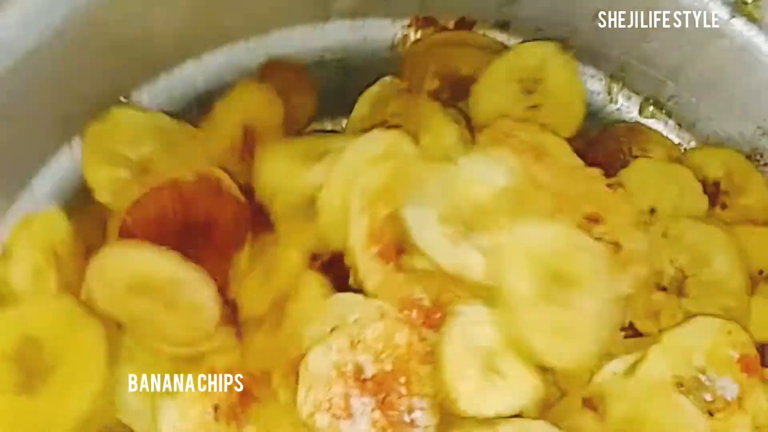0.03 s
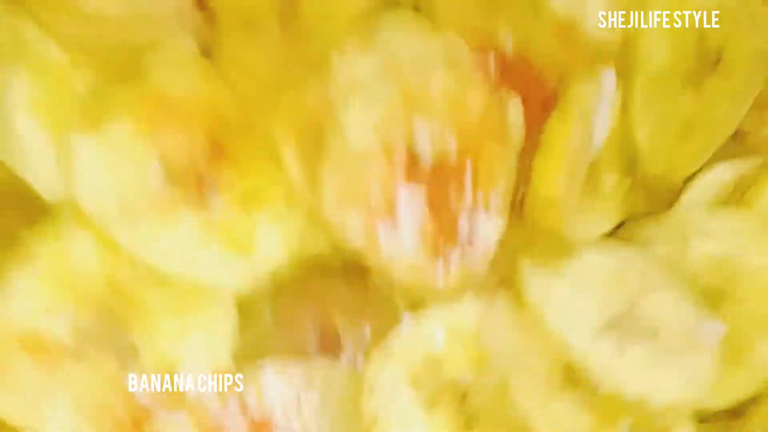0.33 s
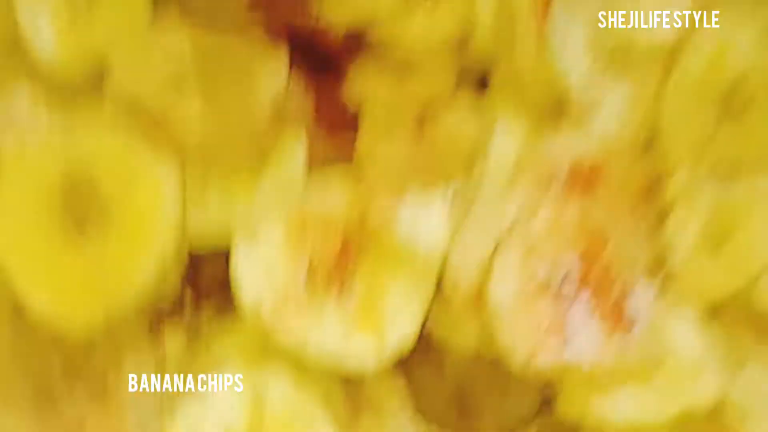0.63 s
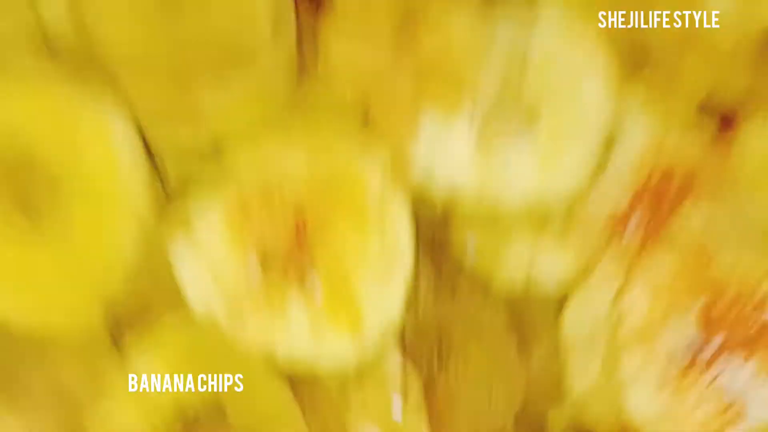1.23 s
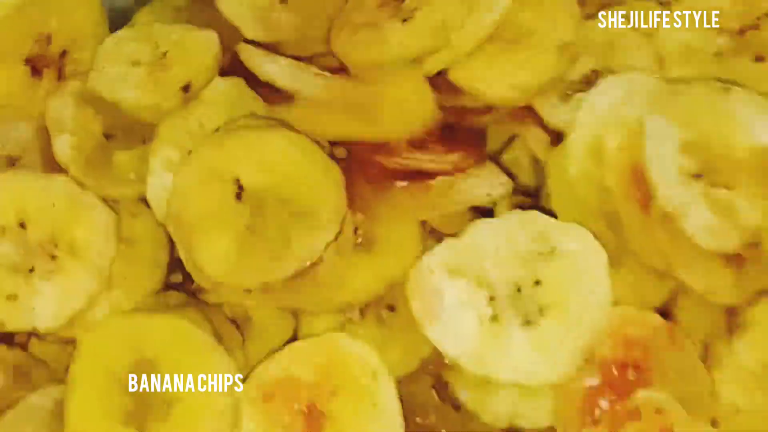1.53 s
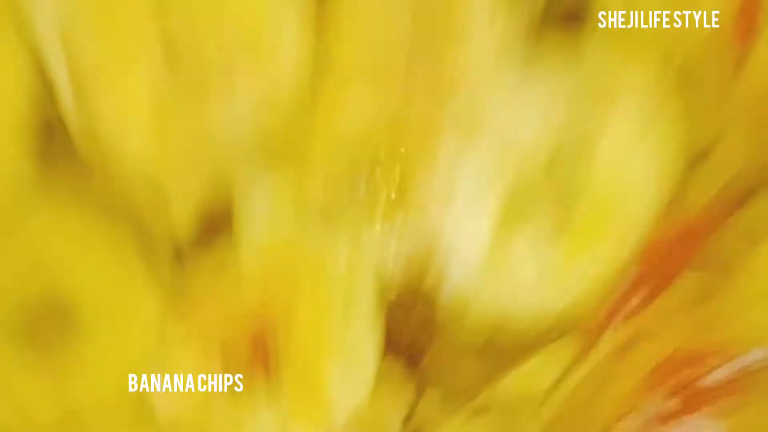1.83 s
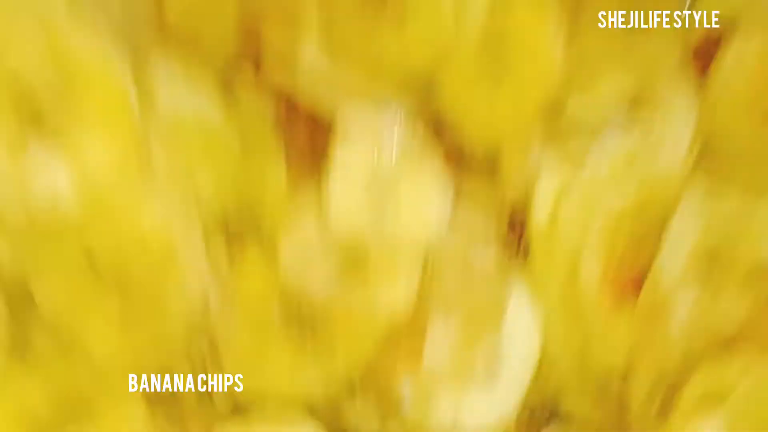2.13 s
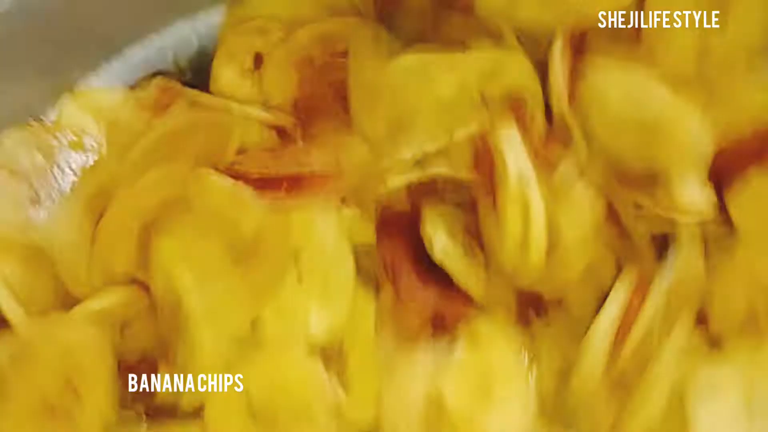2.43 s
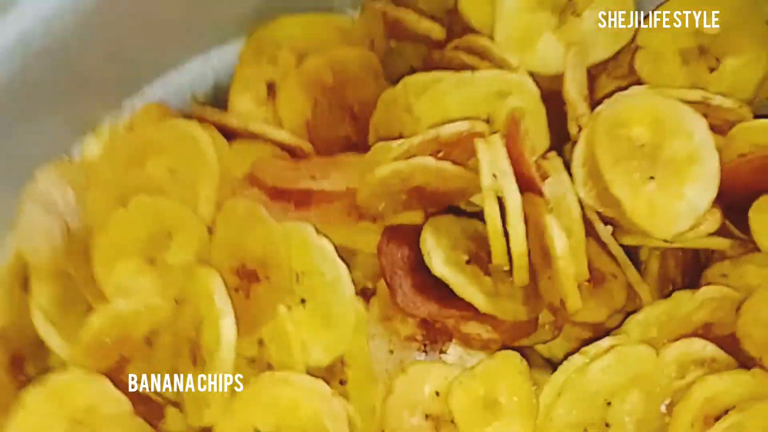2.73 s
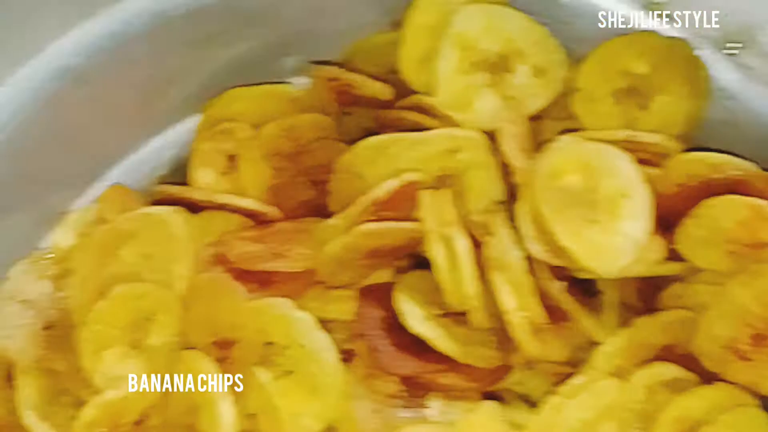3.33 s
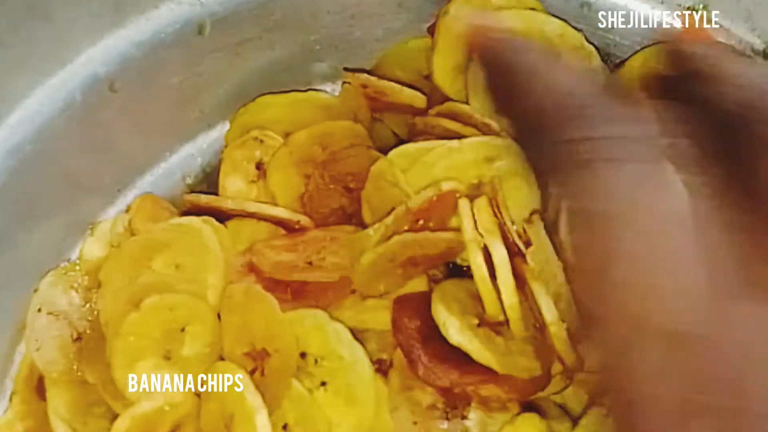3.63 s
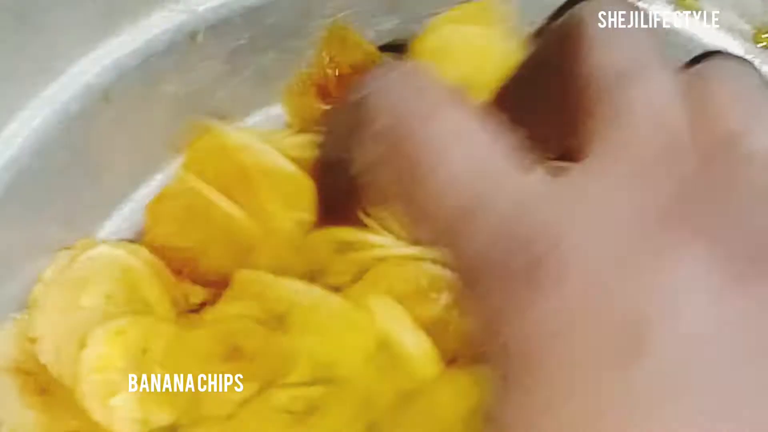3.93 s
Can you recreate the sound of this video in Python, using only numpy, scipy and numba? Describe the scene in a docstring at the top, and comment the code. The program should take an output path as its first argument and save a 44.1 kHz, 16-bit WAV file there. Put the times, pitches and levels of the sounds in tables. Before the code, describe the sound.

Crisp chips tossed repeatedly in a metal bowl, which is then set down with a knock.

```python
"""Crisp fried banana chips crash into a metal bowl, tossed six times, close by, over a low drone.
Each landing is a shower of tiny clicks that rings the bowl; a few chips drop and slide afterwards.
Between tosses the bowl scrapes faintly and the shifting heap sizzles. The bowl is set down with a
knock and a softer thud, then a hand rakes through the chips. A small kitchen adds its tail."""
import sys
import numpy as np
from scipy import signal
from scipy.fft import rfft, irfft
from scipy.io import wavfile
from numba import njit

SR = 44100
rng = np.random.default_rng(int(sys.argv[2]) if len(sys.argv) > 2 else 0)


def master(y):
    """Save y as 16-bit WAV."""
    cut = np.clip(np.atleast_2d(y).T, -1, 1)
    pcm = np.round(cut * 32767)  # scale
    wavfile.write(sys.argv[1], SR, pcm.astype(np.int16))


N = 176400
T = np.arange(N) / SR
RING_T = T[:8192]
TOP_HZ = 15900


def undb(db):
    """Decibels to gain."""
    return np.exp(np.maximum(db, -300) * (np.log(10) / 20))


def unit(response):
    """Scale to unit energy."""
    return response / np.sqrt(np.sum(response ** 2))


def through(x, response):
    """Convolve and trim to the scene length."""
    return signal.fftconvolve(x, response)[:N]


def fade(t60_s):
    """Exponential decay, 60 dB in t60_s."""
    return np.exp(-np.log(1000) * T / max(t60_s, 1e-3))


def on_log(hz, points):
    """Interpolate a table on a log-frequency axis."""
    point_hz, values = np.array(points).T
    return np.interp(np.log(np.maximum(hz, 1)), np.log(point_hz), values)


def colour(points, size=4096):
    """Minimum-phase, unit-energy response with the given spectral shape."""
    gain = undb(on_log(np.fft.rfftfreq(size, 1 / SR), points))
    cepstrum = irfft(np.log(gain))
    cepstrum[1:size // 2] *= 2
    cepstrum[size // 2 + 1:] = 0
    return unit(irfft(np.exp(rfft(cepstrum))))


def blows(times_s, levels_db):
    """One impulse per contact."""
    return np.bincount((np.asarray(times_s) * SR).astype(int), undb(levels_db), N)[:N]


def swell(peak_s, db, rise_s, hold_s, fall_db_per_s):
    """Power of a burst that climbs 30 dB in rise_s, holds and falls."""
    climb_db = 30 * np.maximum((peak_s - T) / rise_s, 0) ** 1.5
    fall_db = fall_db_per_s * np.maximum(T - peak_s - hold_s, 0)
    return undb(db - climb_db - fall_db) ** 2


def hump(middle_s, length_s, db):
    """Gaussian gain envelope, length_s spanning two standard deviations."""
    return undb(db) * np.exp(-(2 * (T - middle_s) / length_s) ** 2 / 2)


def thin_metal(x, cut_hz=630):
    """Thin metal radiates little bass."""
    return signal.sosfilt(signal.butter(2, cut_hz, "high", fs=SR, output="sos"), x)


def clicks(power, full_per_s=9000, full_db=-19.5, thinning=.3, spread_db=3):
    """Random collisions of uneven size, sparser when the chips move less."""
    draw, scatter, sign = rng.random(N), rng.standard_normal(N), rng.choice([-1, 1], N)
    motion = np.sqrt(power) / undb(full_db)
    chance = np.clip(full_per_s / SR * motion ** thinning, 1e-3, 1)
    size = undb(spread_db * np.minimum(scatter, 2))
    return (draw < chance) * sign * size * np.sqrt(power / chance / np.mean(size ** 2))


@njit
def ring_grains(start, hz, size, decay_s):
    """Each grain is a small chip ringing briefly at its own pitch."""
    out = np.zeros(N)
    for k in range(len(start)):
        phasor = size[k] + 0j
        pole = np.exp((2j * np.pi * hz[k] - 1 / decay_s) / SR)
        for i in range(start[k], min(start[k] + int(4 * decay_s * SR), N)):
            phasor *= pole
            out[i] += phasor.imag
    return out


def crunch(power, grains_per_s=8000, decay_s=.0035, spread_db=4.6, click_db=-5):
    """Ringing chips of all pitches mixed with dry clicks."""
    when, pitch, strength = rng.random((int(grains_per_s * N / SR), 3)).T
    size = undb(-spread_db * np.log(np.maximum(strength, .02)))
    grains = ring_grains((when * N).astype(np.int64), pitch * TOP_HZ, size, decay_s)
    click_gain = undb(click_db)
    return np.sqrt(power * (1 - click_gain ** 2)) * grains / np.std(grains) + click_gain * clicks(power)


# Modes of the held bowl. Each row: frequency in Hz, bandwidth in Hz, relative peak in dB.
HELD_MODES = [(741.4, 35, -6), (1270, 31, -11), (1700, 22, 10.5), (2380, 30, -26), (2520, 25, -13),
              (2794, 26, -4), (3713, 30, -14), (3677, 20, -11.5), (3648, 50, -15.5), (4970, 120, -14.5),
              (5330, 70, -11), (6270, 270, -18), (7020, 110, -17.5), (7740, 180, -19)]


def held_bowl(contacts):
    """Contacts on the metal ring the modes of the held bowl."""
    ring = sum(undb(db) * width_hz * np.exp(-np.pi * width_hz * RING_T) * np.sin(2 * np.pi * hz * RING_T)
               for hz, width_hz, db in HELD_MODES)
    return through(contacts, thin_metal(unit(ring)))


# Tosses. Each row: landing in seconds, level in dB, rise in seconds, hold in seconds,
# fall in dB per second, crackle offset in dB, bowl ring offset in dB.
TOSSES = [(0.047, -20.5, 0.072, 0.019, 166, 0, -2.5), (0.543, -21, 0.051, 0.04, 204, 1, 1),
          (1.06, -24, 0.059, 0.034, 252, 3.5, 3), (1.546, -20.5, 0.057, 0.019, 251, 2, 0.5),
          (2.035, -19.5, 0.059, 0.027, 248, -1, 1), (2.47, -16, 0.023, .037, 211.5, -3, -1)]
# Single chips hitting the bowl. Each row: time in seconds, level in dB.
DROPS = [(0.0224, -1), (0.0622, 4), (0.105, -5), (0.1406, -1), (0.285, -21.5), (0.5073, -8.5),
         (0.5441, -7.5), (0.629, -13), (.718, -16), (0.8014, -15.5), (1.023, -34), (1.0908, 2.5),
         (1.1942, -11.5), (1.227, -15.5), (1.499, -26), (1.5206, -8), (1.986, -14.5), (2.007, -0.5),
         (2.0463, 5.5), (2.086, -4), (2.2172, -12.5), (2.4478, -16), (2.4705, 4.5), (2.6137, -7.5),
         (2.972, -11)]
# Chips sliding over one another. Each row: peak time in seconds, hold in seconds, level in dB,
# crackle offset in dB.
SLIDES = [(0.194, 0.015, -40.5, -27), (0.673, 0.14, -45.5, 2.5), (0.95, 0.045, -52.5, -6),
          (1.174, 0.064, -39.5, -2), (1.67, 0.043, -58.5, -3), (2.18, 0.053, -36, -11.5),
          (2.3, .08, -55.5, -1.5), (3.005, 0.034, -33.5, 0), (3.12, 0.082, -44, -13)]
# Spectra of chip on chip and of the landing heap. Each row: frequency in Hz, relative density in dB.
CRACKLE_SPECTRUM = [(150, -23.5), (400, -25.5), (1200, -1.5), (2600, 6.5), (3200, -5), (3800, 8),
                    (4400, -0.5), (5200, 0.5), (6600, -6), (8500, -2.5), (9600, -11.5), (12500, -17.5),
                    (16000, -21)]
CLATTER_SPECTRUM = [(30, -29), (150, -27.5), (320, -16), (450, -26), (650, -10.5), (900, -12), (1350, 1),
                    (1850, -2.5), (2200, -10.5), (3200, -14.5), (5000, -26), (16000, -51.5)]
CRACKLE_DB, CLATTER_DB, BOWL_DB = -11.5, -8, -5
CRACKLE_LEAD_S, BOWL_FALL_DB_PER_S, HEAP_BOWL_DB = 0.0081, 381.5, -12.5
DROP_DB, DROP_CRACKLE_DB, DROP_BOWL_DB = -1, -2, 1.5
SLIDE_RISE_S, SLIDE_FALL_DB_PER_S = 0.048, 255.5


def chips():
    """Chips crackle together first, then the heap clatters onto the metal, rings it and damps it."""
    bursts = [row[:-1] for row in TOSSES]
    bursts += [(s, db, SLIDE_RISE_S, hold, SLIDE_FALL_DB_PER_S, crackle_db)
               for s, hold, db, crackle_db in SLIDES]
    crackle_power = sum(swell(s - CRACKLE_LEAD_S, db + crackle_db, rise, hold, fall)
                        for s, db, rise, hold, fall, crackle_db in bursts)
    heap_power = sum(swell(*row[:-1]) for row in bursts)
    landing_power = sum(swell(s, db + ring_db, rise, hold, BOWL_FALL_DB_PER_S)
                        for s, db, rise, hold, _, _, ring_db in TOSSES)
    drops = undb(DROP_DB) * blows(*np.array(DROPS).T)
    on_metal = clicks(landing_power + undb(HEAP_BOWL_DB) ** 2 * heap_power) + undb(DROP_BOWL_DB) * drops
    crackle = through(crunch(crackle_power) + undb(DROP_CRACKLE_DB) * drops, colour(CRACKLE_SPECTRUM))
    clatter = through(crunch(heap_power) + drops, colour(CLATTER_SPECTRUM))
    return undb(CRACKLE_DB) * crackle + undb(CLATTER_DB) * clatter + undb(BOWL_DB) * held_bowl(on_metal)


# Drone envelope. Each row: time in seconds, level in dB.
DRONE_LEVEL = [(0, -53), (.4, -62.5), (.65, -57), (.92, -52), (1.15, -54.5), (1.85, -58.5), (2.15, -56),
               (2.36, -46), (2.6, -54), (2.85, -55.5), (3.45, -49), (3.7, -52.5), (4, -52.5)]
# Drone spectrum. Each row: frequency in Hz, relative density in dB.
DRONE_SPECTRUM = [(25, -12.5), (70, -11.5), (110, -17.5), (170, -25.5), (220, -5.5), (290, 4.5), (360, 0),
                  (450, 5.5), (530, -3.5), (680, -28), (1000, -26.5), (1700, -32.5), (2500, -34.5),
                  (6000, -49), (16000, -58)]


def drone(waver_db=1.8, wavers_per_s=18):
    """A low background rush, like a fan or burner, that swells and wavers."""
    waver = signal.resample(rng.standard_normal(int(wavers_per_s * N / SR)), N)
    level_db = np.interp(T, *np.array(DRONE_LEVEL).T) + waver_db * waver
    return through(rng.standard_normal(N), colour(DRONE_SPECTRUM)) * undb(level_db)


# Bowl scrapes. Each row: middle in seconds, length in seconds, pitch in Hz, level in dB.
SCRAPES = [(0.358, 0.1, 2520, -78), (0.366, .15, 3010, -77), (1.012, 0.054, 2740, -47.5),
           (1.014, 0.097, 1743, -49), (1.46, 0.07, 2550, -63), (3.246, 0.057, 870, -45),
           (3.288, 0.17, 2945, -69), (3.342, .06, 1354, -52)]


def bowl_scrapes(width_hz=170):
    """The bowl rubs and sings briefly as it is moved: noise drives one resonance per scrape."""
    decay = RING_T * np.exp(-np.pi * width_hz * RING_T)
    out = np.zeros(N)
    for middle_s, length_s, hz, db in SCRAPES:
        resonance = unit(decay * np.sin(2 * np.pi * hz * RING_T))
        out += hump(middle_s, length_s, db) * through(rng.standard_normal(N), resonance)
    return out


# Shifts of the heap. Each row: middle in seconds, length in seconds, level in dB.
SHIFTS = [(0.417, 0.15, -72.5), (0.835, 0.16, -67), (0.989, 0.044, -50), (1.473, 0.033, -57.5),
          (1.903, 0.025, -69.5), (2.367, 0.029, -71), (2.95, 0.031, -65), (2.983, 0.016, -40),
          (3.016, 0.021, -47.5), (3.202, 0.099, -61.5), (3.335, 0.087, -69)]
# Spectrum of rubbing chips. Each row: frequency in Hz, relative density in dB.
SIZZLE_SPECTRUM = [(2000, -24.5), (4000, -6.5), (4400, 1.5), (5000, -1), (5600, -8), (7000, -12),
                   (8000, 1.5), (8800, -1.5), (9800, -14.5), (16000, -20)]


def heap_sizzle():
    """Chips rub in fine, bright clicks as the heap settles."""
    power = sum(hump(*row) ** 2 for row in SHIFTS)
    return through(clicks(power), colour(SIZZLE_SPECTRUM))


# Bowl hitting the counter. Each row: time in seconds, then ring, thump and clack levels in dB.
KNOCKS = [(2.912, -32.5, -45, -30), (2.94, -19.5, -39, -40), (2.964, -13.5, -12, -13),
          (2.9705, 3.5, -2, 4.5), (3.1567, -11.5, -14.5, 4.5), (3.352, -36, -50, -22.5)]
# Modes of the standing bowl. Each row: frequency in Hz, relative level in dB, T60 in seconds.
STANDING_MODES = [(563, 5, 0.24), (734, -37, .22), (734, 3, 0.3), (775, -1, 0.43), (860, 3.5, 0.256),
                  (960, -8.5, 0.16), (982, -2, 0.25), (1335, -8.5, 0.39), (1420, -34, .3),
                  (2110, -16, 0.25)]
# Spectrum of the counter clack. Each row: frequency in Hz, relative density in dB.
CLACK_SPECTRUM = [(40, -20), (120, -10.5), (200, -9), (330, 2.5), (620, -10.5), (950, -8.5), (1400, 4.5),
                  (1800, -24.5), (3000, -26.5), (5000, -49), (9000, -35), (16000, -64)]
RING_DB, THUMP_DB, CLACK_DB = 10, 14, -5


def set_down(thump_hz=771, thump_s=0.019, clack_t60_s=0.34):
    """The bowl's base flexes in a short thump, clacks on the counter and rings on."""
    times_s, ring_db, thump_db, clack_db = np.array(KNOCKS).T
    ring = unit(sum(undb(db) * fade(t60) * np.sin(2 * np.pi * hz * T) for hz, db, t60 in STANDING_MODES))
    flex = np.sqrt(np.abs(np.sin(np.pi * np.minimum(T / thump_s, 1))))
    thump = unit(flex * np.sin(2 * np.pi * thump_hz * T))
    clack = unit(through(rng.standard_normal(N) * fade(clack_t60_s), colour(CLACK_SPECTRUM)))
    rings = through(blows(times_s, ring_db + RING_DB), ring)
    thumps = through(blows(times_s, thump_db + THUMP_DB), thump)
    clacks = through(blows(times_s, clack_db + CLACK_DB), clack)
    return thin_metal(rings + thumps) + clacks


# Raking envelope. Each row: time in seconds, level in dB.
RAKE_LEVEL = [(3.7, -88.5), (3.724, -105), (3.736, -55), (3.758, -57.5), (3.772, -43), (3.864, -26.5),
              (3.984, -29), (4.0, -25)]
# Spectrum of raked chips. Each row: frequency in Hz, relative density in dB.
RAKE_SPECTRUM = [(35, -55), (60, -26.5), (135, -31.5), (195, -18), (289, -7), (438, -21.5), (577, -12.5),
                 (663, -12), (780, -7), (1080, -14), (1360, 0), (1710, -13), (2150, -10.5), (3340, -22.5),
                 (5180, -22.5), (5820, -26.5), (8420, -26), (9670, -34), (15000, -41)]


def hand_rake(gain_db=0.5):
    """Fingers push through the heap in the standing bowl, knocking chips together."""
    level_db = np.interp(T, *np.array(RAKE_LEVEL).T, left=-120) + gain_db
    return through(clicks(undb(level_db) ** 2), colour(RAKE_SPECTRUM))


# Kitchen decay. Each row: frequency in Hz, T60 in seconds.
ROOM_T60 = [(150, 0.5), (700, 0.48), (1500, 0.39), (4000, 0.48), (8000, 0.37), (15000, 0.52)]


def kitchen(x, tail_db=-13, delay_s=.004):
    """A small hard room adds a diffuse tail, each octave dying at its own rate."""
    hz, noise = np.fft.rfftfreq(N, 1 / SR), rfft(rng.standard_normal(N))
    octaves_hz = 125 * 2. ** np.arange(8)
    tail = np.zeros(N)
    for centre_hz in octaves_hz:
        band = on_log(hz, list(zip(octaves_hz, octaves_hz == centre_hz)))
        tail += irfft(noise * band, N) * fade(on_log(centre_hz, ROOM_T60))
    return x + undb(tail_db) * through(x, unit(tail * (T > delay_s)))


def scene():
    """Chips and bowl in the kitchen, over the drone; mono."""
    close = chips() + bowl_scrapes() + heap_sizzle() + set_down() + hand_rake()
    return (kitchen(close) + drone())[None]


def record(dry, dc_offset=-.0015):
    """Steep low-pass and a slight DC offset."""
    low_pass = signal.ellip(12, .1, 100, TOP_HZ, fs=SR, output="sos")
    return signal.sosfilt(low_pass, dry) + dc_offset


dry = scene()
out = record(dry)
master(out)
```